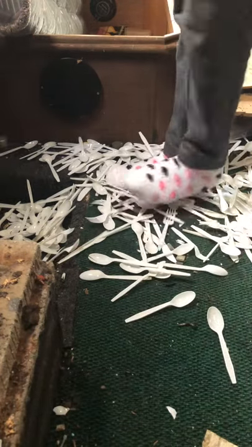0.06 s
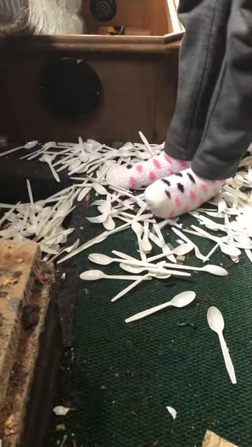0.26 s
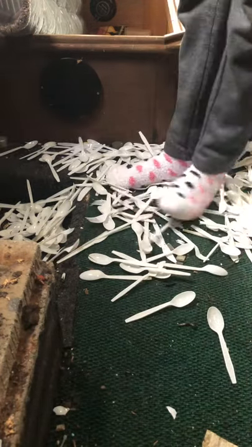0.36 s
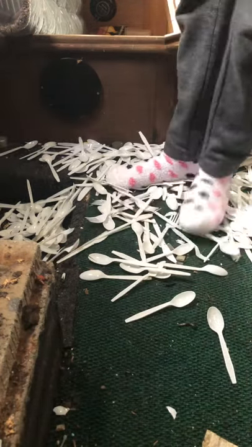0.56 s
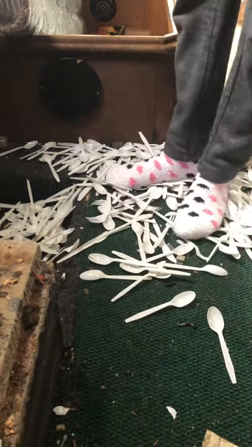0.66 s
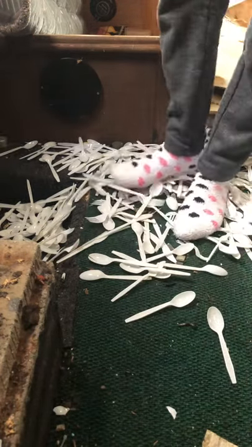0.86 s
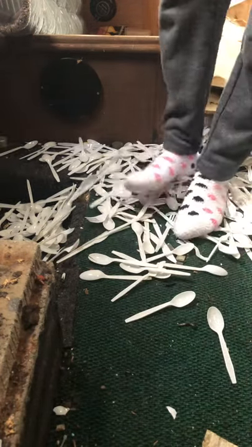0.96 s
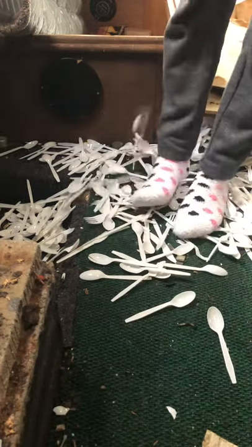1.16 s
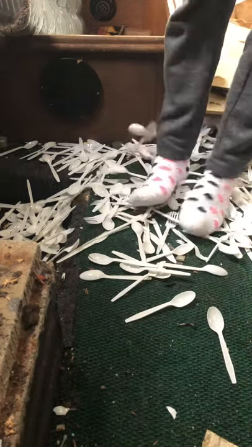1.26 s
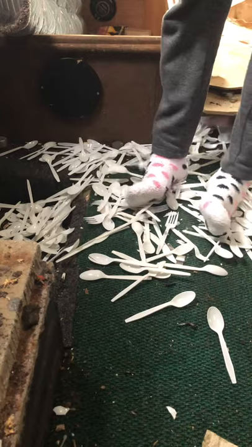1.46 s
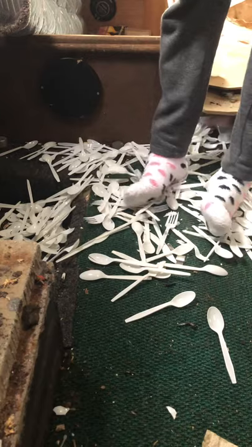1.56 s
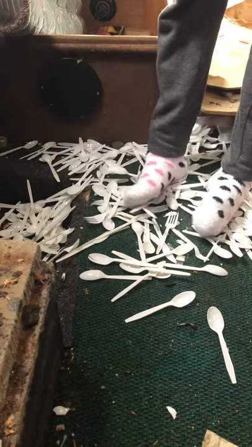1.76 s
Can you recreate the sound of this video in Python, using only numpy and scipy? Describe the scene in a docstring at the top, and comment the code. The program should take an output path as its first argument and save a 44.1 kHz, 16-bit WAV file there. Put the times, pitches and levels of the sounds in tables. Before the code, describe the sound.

Plastic spoons and forks crack and clatter under socked feet on a carpeted floor; sparse ticks at first, then dense bright snaps, strongest near 0.8 and 1.3 seconds, fading afterwards; small furnished room, close phone microphone.

```python
"""Socked feet trample a heap of thin plastic spoons and forks on a carpeted floor, a metre or two from a phone.
From the start: faint shaped-noise background, heap clatter (random ticks ringing a few pieces) and
floor rumble (noise through board modes). Within 0.1 s cracks (gritty noise bursts ringing spoon modes)
and knocks (decaying sines) join. Cracks crowd from 0.2 s, peak near 0.8 and 1.3 s, thin out after 1.6 s.
A small furnished room (decaying noise) answers the plastic throughout."""
import sys
import numpy as np
from scipy import signal
from scipy.fft import rfft, irfft
from scipy.io import wavfile

SR = 44100
rng = np.random.default_rng(int(sys.argv[2]) if len(sys.argv) > 2 else 0)


def voltage_ratio(level):
    """Linear amplitude factor for a level in decibels (scalar or array-like)."""
    return 10 ** (np.asarray(level, float) / 20)


def pcm_store(signal):
    """Save signal as 16-bit PCM."""
    levels = np.round(np.clip(np.atleast_2d(signal), -1, 1) * 32767)
    wavfile.write(sys.argv[1], SR, levels.astype(np.int16).T)


N = 79380  # samples, 1.8 s
PIECE_N = 8192  # FFT length; a piece's response is half of it
FLOOR_N = 8192  # samples of floor ringing


def unit(x):
    """Scale to rms 1."""
    return x / np.sqrt(np.mean(x ** 2))


def shape(table, hz):
    """Gain at hz from (f/Hz, level/dB) points, linear in log frequency."""
    f_hz, level_db = np.array(table).T
    return voltage_ratio(np.interp(np.log(hz + 1), np.log(f_hz), level_db))


def curve(table):
    """Gain over time from (t/s, level/dB) points."""
    t_s, level_db = np.array(table).T
    return voltage_ratio(np.interp(np.arange(N) / SR, t_s, level_db))


def add(out, start_s, x):
    """Mix x into out at start_s, cut at the end."""
    i = max(int(start_s * SR), 0)
    out[i:i + len(x)] += x[:N - i]


def modes(hz, t60_s, gain, size):
    """Sum of exponentially decaying sines."""
    t = np.arange(size) / SR
    decay = np.exp(-np.log(1000) * t / np.array(t60_s)[:, None])
    return gain @ (np.sin(2 * np.pi * np.outer(hz, t)) * decay)


def favour(mode_hz, ring_hz):
    """Extra dB for modes near the pitch that the struck spot favours."""
    boost_db, width_oct = 10, 0.073
    return boost_db * np.exp(-(np.log2(mode_hz / ring_hz) / width_oct) ** 2)


# background spectrum: f/Hz, relative level/dB
AIR_COLOUR = [(25, -20), (50, -24), (75, -47), (110, 3), (190, 8.5), (311, -8.5), (1070, -4.5), (3980, -8),
              (6500, -12.5), (10000, -52), (16000, -58)]


def air():
    """Faint steady background of the house: noise with a fixed spectrum."""
    level_db = -56
    hz = np.arange(N // 2 + 1) * SR / N
    spectrum = rfft(rng.standard_normal(N)) * shape(AIR_COLOUR, hz)
    return voltage_ratio(level_db) * unit(irfft(spectrum, N))


# spoon modes: f/Hz, width/Hz (before the floor in piece()), relative level/dB
SPOON_MODES = [(2830, 170, -7.5), (4047, 40, 4.5), (5095, 43, -12), (5920, 37, 3.5), (7496, 20.3, 6.5),
               (8550, 230, 6), (9070, 100, 4.5), (10660, 14, -34), (11360, 50, -25), (11800, 29, 1),
               (12730, 37, 0), (13400, 130, 7), (14780, 40, 2.5), (15570, 53, 4)]
# snap spectrum: f/Hz, relative level/dB
SNAP_COLOUR = [(180, -47.5), (300, -13), (961, -10.5), (1720, -1), (3890, 6), (4300, 6), (5800, 9),
               (6620, 2.5), (7440, 4.5), (16000, 5.5)]


def piece(tilt_db_per_oct, ring_db, ring_hz):
    """Response of one spoon, energy 1: a causal coloured snap and its own modes, each a close pair."""
    min_width_hz, max_ring_db = 110, 4.5  # ring level is over snap
    gain_scatter_db, pitch_scatter = 3.5, 0.009  # piece to piece; pitch as a share

    def tilt(f):
        return voltage_ratio(tilt_db_per_oct * np.log2(np.clip(f, 500, 16000) / 6000))

    # minimum-phase snap by folding the cepstrum
    hz = np.arange(PIECE_N // 2 + 1) * SR / PIECE_N
    cepstrum = irfft(np.log(shape(SNAP_COLOUR, hz) * tilt(hz) + 1e-4))
    cepstrum[1:PIECE_N // 2] *= 2
    cepstrum[PIECE_N // 2 + 1:] = 0
    snap = unit(irfft(np.exp(rfft(cepstrum))))[:PIECE_N // 2]

    f, width, db = np.repeat(np.array(SPOON_MODES, float), 2, axis=0).T
    width = np.maximum(width, min_width_hz)
    detune, scatter = rng.standard_normal((2, len(f)))
    gain_db = db + favour(f, ring_hz) + gain_scatter_db * scatter
    gain = np.sqrt(width) * voltage_ratio(gain_db) * tilt(f)
    t60_s = np.log(1000) / np.pi / width
    ring = unit(modes(f * (1 + pitch_scatter * detune), t60_s, gain, PIECE_N // 2))
    both = snap + voltage_ratio(min(ring_db, max_ring_db)) * ring
    return unit(both) / np.sqrt(PIECE_N / 2)


# clatter of the heap: t/s, rms level/dB
CLATTER_LEVEL = [(0, -41.5), (.05, -49.5), (.1, -65), (.19, -48), (.3, -42), (.39, -36), (.45, -42.5),
                 (.55, -54.5), (.63, -36), (.73, -54), (.79, -40), (.86, -34.5), (1.0, -34.5),
                 (1.12, -30.5), (1.19, -36), (1.29, -35), (1.36, -31), (1.41, -36), (1.45, -36),
                 (1.51, -44), (1.6, -64), (1.72, -66), (1.76, -61), (1.8, -52)]


def clatter(count=24):
    """Many small ticks of pieces rubbing and bouncing, shared among a few pieces."""
    ticks_per_s, tick_decay_s = 600, 0.0014  # rate over all pieces
    scatter_db, max_scatters = 3.5, 2.5
    ring_db, ring_choices_hz = -2.5, (3900., 3900., 5000., 5900., 8450.)
    t = np.arange(1024) / SR
    out = np.zeros(N)
    for _ in range(count):
        hit = rng.random(N) < ticks_per_s / count / SR
        loudness = np.minimum(rng.exponential(size=N), max_scatters)
        ticks = hit * voltage_ratio(scatter_db * loudness)
        burst = rng.standard_normal(len(t)) * np.exp(-t / tick_decay_s)
        response = piece(0.5 * rng.standard_normal(), ring_db, rng.choice(ring_choices_hz))
        body = unit(signal.fftconvolve(burst, response))
        out += signal.fftconvolve(ticks, body)[:N]
    return unit(out) * curve(CLATTER_LEVEL)


# floor modes, for weight() and knocks(): f/Hz, relative level/dB, t60/s
BOARD_MODES = [(111.3, -7, 0.14), (165, -2, 0.12), (195, 1.5, 0.15), (320, -9.5, 0.089), (445, -3, 0.14),
               (650, -2.5, 0.054), (760, 4.5, 0.051), (1000, 6, 0.039), (1524, -18, 0.066),
               (2010, 2, 0.045), (2590, -1.5, 0.027)]
# rumble of the boards under weight: t/s, rms level/dB
WEIGHT_LEVEL = [(0, -63.5), (.1, -60), (.24, -51.5), (.35, -65), (.44, -62), (.52, -64), (.57, -49.5),
                (.66, -71), (.77, -55), (.88, -75), (.97, -81), (1.12, -48.5), (1.22, -55), (1.36, -58),
                (1.46, -66), (1.57, -55.5), (1.8, -60)]


def weight():
    """Shifting weight: noise rings the floor boards, upper modes weakened above 170 Hz."""
    f, db, t60_s = np.array(BOARD_MODES).T
    boards = modes(f, t60_s, voltage_ratio(db) / (1 + (f / 170) ** 2), FLOOR_N)
    rumble = signal.fftconvolve(rng.standard_normal(N), boards)[:N]
    return unit(rumble) * curve(WEIGHT_LEVEL)


# cracks: t/s, level/dB (re base_db), burst length/s, treble tilt/(dB/octave),
# ring over snap/dB (before the cap in piece()), favoured ring f/Hz
CRACK_EVENTS = [(0.0224, -32, 0.016, -1.5, -11, 3440), (0.055, -28.5, 0.0076, -3.5, -3.0, 8540),
                (0.135, -21.5, 0.0039, -0.6, -9, 3440), (0.16, -24.5, 0.011, -0.3, -19, 6300),
                (0.1764, -28.5, 0.0092, -12.8, 0, 6120), (0.1985, -11.5, 0.011, 2.1, -3.5, 7300),
                (0.2214, -18.5, 0.0083, 2.3, 5, 4060), (0.2755, -13.5, 0.0067, -0.2, 3.5, 6050),
                (0.32, -14.5, 0.0082, -0.5, -4, 5900), (0.3463, -20, 0.015, -2, 6, 5400),
                (0.37, -12.5, 0.0094, 2.5, 7.5, 6200), (0.3924, -9, 0.01, 1.7, -4, 8400),
                (0.4623, -45.5, 0.027, -4, -6, 3700), (0.4767, -13, 0.0064, -5.4, -8, 6650),
                (0.574, -24.5, 0.0034, 3.5, -10, 4730), (0.5831, -9, 0.0083, 0.6, -12, 5500),
                (0.6017, -18.5, 0.017, -1.7, 7, 3880), (0.615, -10, 0.009, 3.4, -2.5, 8900),
                (0.6363, -11.5, 0.004, -4.3, 4, 3540), (0.656, -16, 0.01, -1.2, -3.0, 2770),
                (0.6745, -14.5, 0.011, -0.4, 5, 8600), (0.734, -36, 0.011, -6.5, -6, 12900),
                (0.7552, -15.5, 0.0078, 2, 1.5, 6460), (0.8066, -1.5, 0.01, 3.3, -1.5, 11130),
                (0.8144, -11, 0.0041, -3.5, 3, 4990), (0.8354, -11.5, 0.022, 0.8, -4, 12800),
                (0.8495, -14.5, 0.024, -0.3, 11, 5920), (0.8882, -19.5, 0.0079, -2, 6, 4020),
                (0.931, -13, 0.013, 0.7, -13, 12200), (0.9466, -11.5, 0.012, 2.5, -12, 6440),
                (0.974, -11, 0.0098, 3.3, -4, 4200), (1.0265, -10.5, 0.017, 3.2, -9, 5300),
                (1.063, -8.5, 0.0058, 1.4, 5, 12300), (1.088, -11, 0.009, 3, 9, 5350),
                (1.1042, -13.5, 0.021, 3.3, -2.5, 8400), (1.1285, -10.5, 0.0038, -4.5, -5, 7490),
                (1.149, -45, 0.009, 5, 1, 5940), (1.2137, -12.5, 0.0065, -1.3, -21, 5700),
                (1.2254, -6, 0.0049, 5, 7.5, 11600), (1.2394, -14, 0.009, -0.8, -9, 5130),
                (1.265, -16.5, 0.012, 7, 11, 6920), (1.3107, -1.5, 0.003, -0.6, 2, 4330),
                (1.3231, -3, 0.008, 0.9, 10, 8360), (1.3286, -1.5, 0.0053, 12.5, 3.5, 11800),
                (1.362, -16, 0.013, -3.5, 12, 8060), (1.386, -31, 0.0081, -6, -13, 8400),
                (1.4217, -17.5, 0.013, 2, 7, 12700), (1.4311, -9, 0.0051, 2, 9, 11800),
                (1.4404, -15.5, 0.011, 1.2, 11, 5900), (1.53, -16.5, 0.011, 1.9, 7.5, 6950),
                (1.5544, -21.5, 0.0086, -1.5, -7, 6200), (1.5653, -22, 0.0048, -1.3, 5, 5800),
                (1.597, -30.5, 0.0074, -4.9, -5, 3700), (1.63, -28, 0.0077, -0.7, 0, 7000),
                (1.67, -39, 0.009, -6.3, -7, 2530), (1.695, -53, 0.0051, -3, -0.5, 4000),
                (1.7526, -38, 0.023, -6.8, 4, 3660)]


def cracks():
    """Each crack is a gritty burst of tiny fractures that dies away and rings one piece."""
    base_db, attack_s = -10, 0.0005
    grit_db, grit_hold = 3.5, 16  # level scatter, redrawn every grit_hold samples
    fall_power = 0.9  # 1 exponential, 2 abrupt
    grit_rms = voltage_ratio(grit_db ** 2 * np.log(10) / 20)
    t = np.arange(PIECE_N // 2) / SR
    out = np.zeros(N)
    for start_s, level_db, length_s, tilt_db, ring_db, ring_hz in CRACK_EVENTS:
        noise = rng.standard_normal(len(t))
        steps = np.repeat(rng.standard_normal(len(t) // grit_hold), grit_hold)
        grit = noise * voltage_ratio(grit_db * steps) / grit_rms
        rise = 1 - np.exp(-t / attack_s)
        fall = np.exp(-(t / length_s) ** fall_power)
        crack = signal.fftconvolve(grit * rise * fall, piece(tilt_db, ring_db, ring_hz))
        add(out, start_s, voltage_ratio(level_db + base_db) * crack)
    return out


# knocks of a piece on the floor: t/s, peak level/dB, hardness as tilt/(dB/octave), favoured ring f/Hz
KNOCK_EVENTS = [(0.0786, -32.5, 4.5, 934), (.134, -37.5, 1.5, 320), (0.169, -41.5, 2, 444),
                (0.226, -40.5, -0.5, 170), (.29, -40, -2, 230), (0.321, -38, -1.5, 195),
                (0.389, -40.5, 7.5, 197), (.476, -37.5, -7, 192), (.609, -42, -7, 168),
                (0.656, -29, -2.5, 1018), (0.68, -41, -2, 182), (0.805, -29, 2.5, 650), (.858, -34, 5, 444),
                (1.054, -44, -0.5, 166), (1.127, -50.5, 14, 165), (1.3109, -22.5, -4.5, 1000),
                (1.379, -34, -3, 176), (1.534, -41, 4.5, 1000), (1.554, -43, -10, 200)]


def knocks():
    """Knocks ring the floor boards; low modes build up later."""
    gain_scatter_db, pitch_scatter, rise_cycles = 1.5, 0.021, 0.4
    f, db, t60_s = np.array(BOARD_MODES).T
    rise_t60_s = np.log(1000) * rise_cycles / f
    out = np.zeros(N)
    for start_s, level_db, tilt_db, ring_hz in KNOCK_EVENTS:
        scatter_db = gain_scatter_db * rng.standard_normal(len(f))
        hardness_db = tilt_db * np.log2(f / f[2])
        gain = voltage_ratio(db + favour(f, ring_hz) + scatter_db + hardness_db)
        hz = f * (1 + pitch_scatter * rng.standard_normal(len(f)))
        knock = modes(hz, t60_s, gain, FLOOR_N) - modes(hz, rise_t60_s, gain, FLOOR_N)
        add(out, start_s, voltage_ratio(level_db) * knock / np.abs(knock).max())
    return out


def room(x):
    """Adds a dense noise tail whose treble dies sooner."""
    t60_s, treble_t60_s, split_hz = 0.27, 0.14, 3000
    tail_db, gap_s = -4.5, 0.004
    t = np.arange(SR // 2) / SR
    noise = rng.standard_normal(len(t))
    low = signal.sosfilt(signal.butter(2, split_hz, fs=SR, output="sos"), noise)
    tail = low * voltage_ratio(-60 * t / t60_s) + (noise - low) * voltage_ratio(-60 * t / treble_t60_s)
    tail = tail * (t > gap_s)
    tail = tail / np.sqrt(np.sum(tail ** 2))
    return x + voltage_ratio(tail_db) * signal.fftconvolve(x, tail)[:N]


def scene():
    """The floor reaches the phone directly; the plastic also rings the room. Neither radiates deep bass."""
    radiation_low_hz = 90
    plastic = room(clatter() + cracks())
    near = plastic + weight() + knocks()
    near = signal.sosfilt(signal.butter(2, radiation_low_hz, "high", fs=SR, output="sos"), near)
    return (near + air())[None]


def top_cut(x):
    """Nothing passes above the cut-off."""
    return signal.sosfilt(signal.butter(12, 16990, fs=SR, output="sos"), x)


def record(dry):
    """The phone cuts the top and the deep bass."""
    top_hz, low_hz = 15800, 40.5
    x = signal.sosfilt(signal.ellip(10, 0.2, 60, top_hz, fs=SR, output="sos"), dry)
    x = signal.sosfilt(signal.butter(2, low_hz, "high", fs=SR, output="sos"), x)
    return top_cut(x)


dry = scene()
out = record(dry)
pcm_store(out)
```